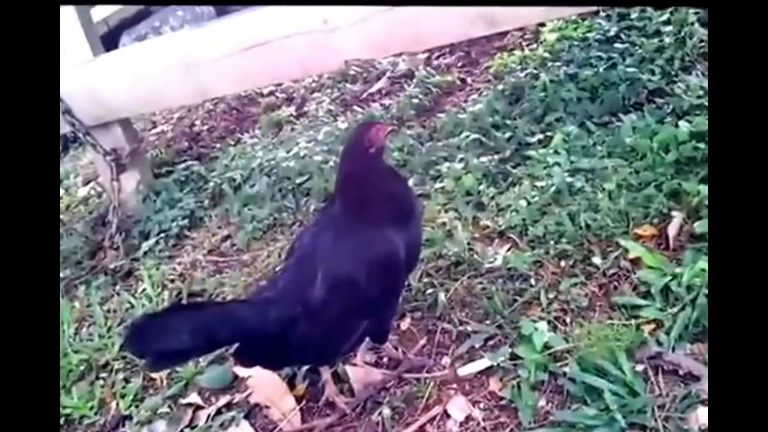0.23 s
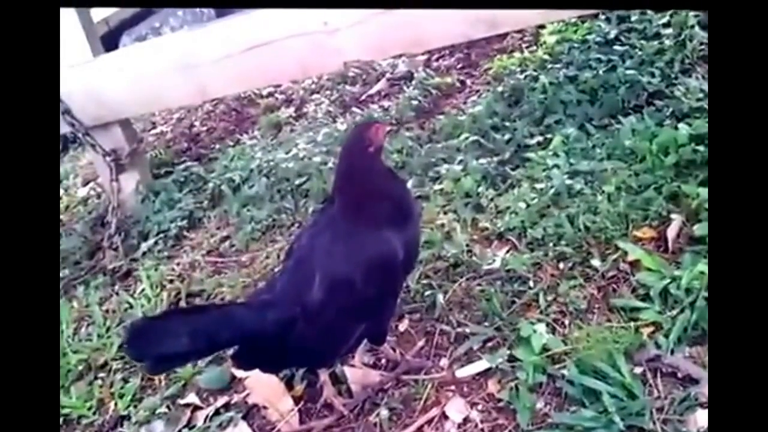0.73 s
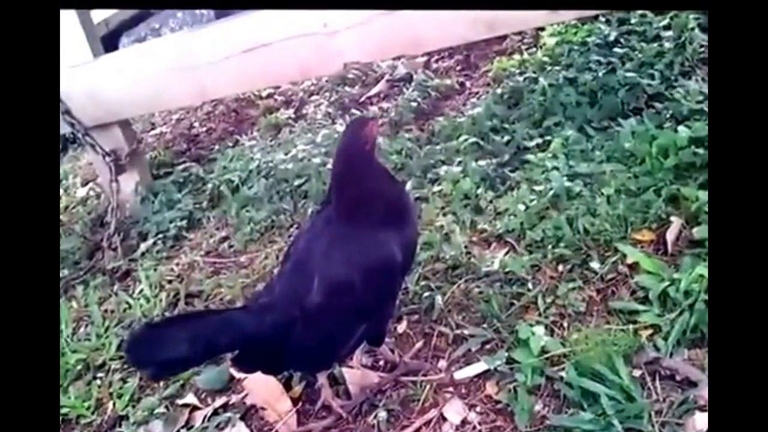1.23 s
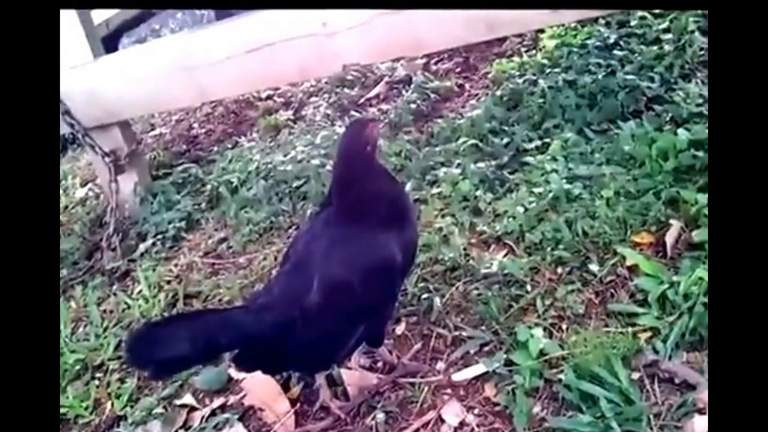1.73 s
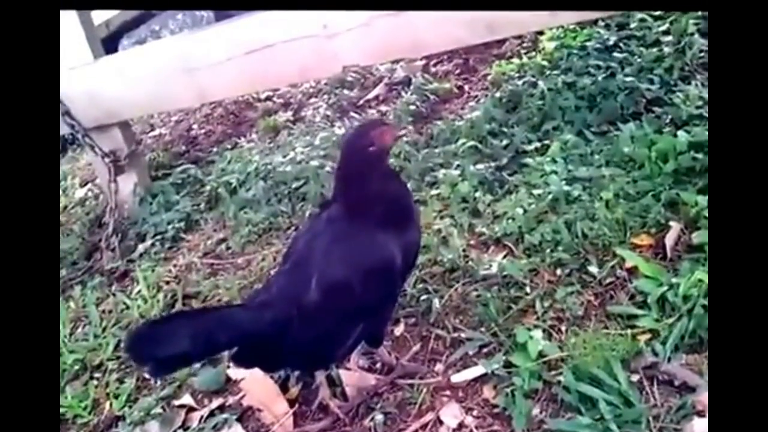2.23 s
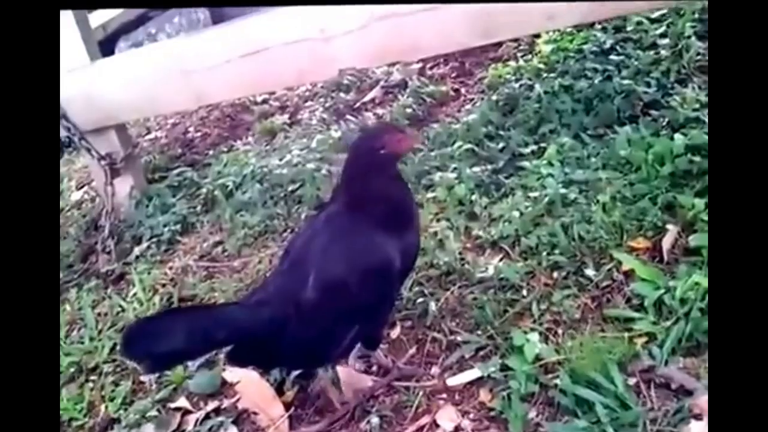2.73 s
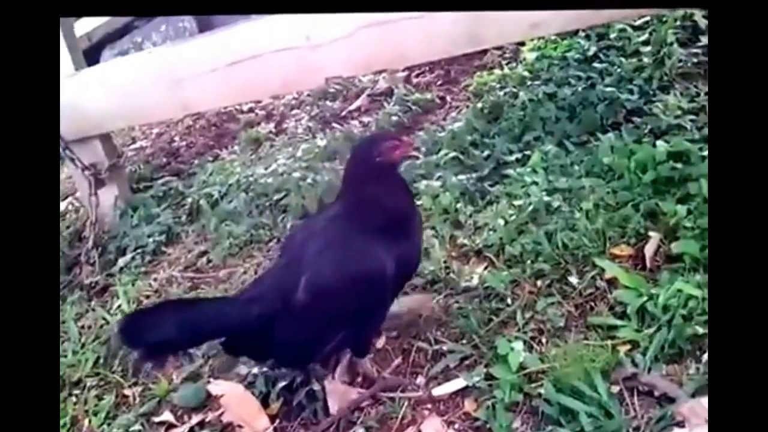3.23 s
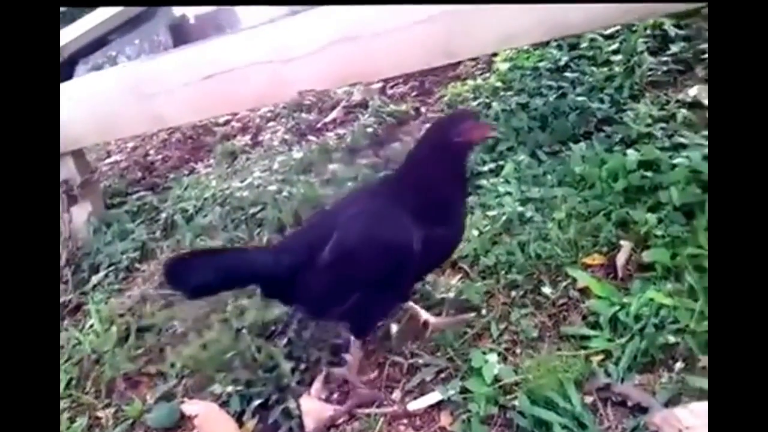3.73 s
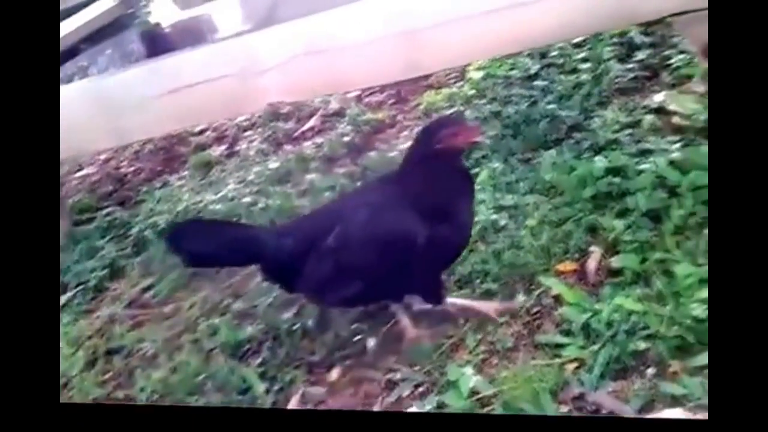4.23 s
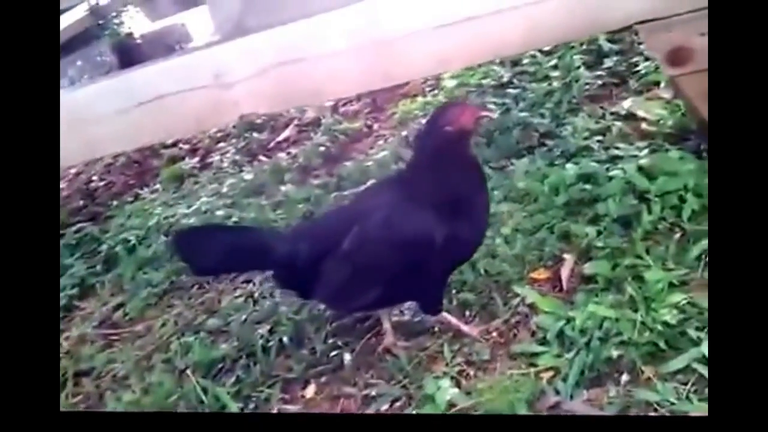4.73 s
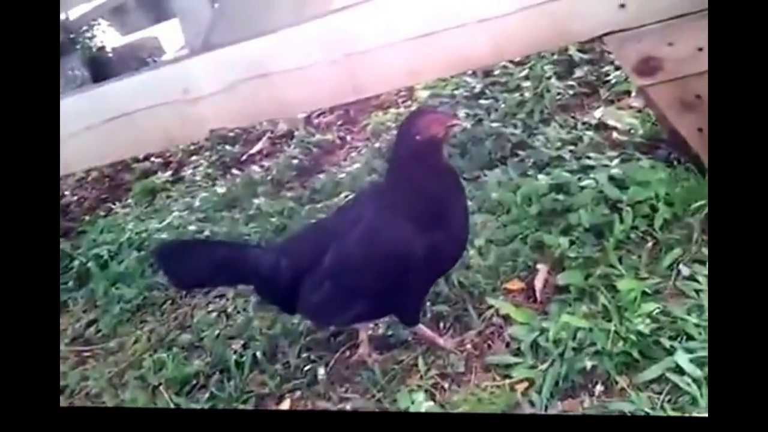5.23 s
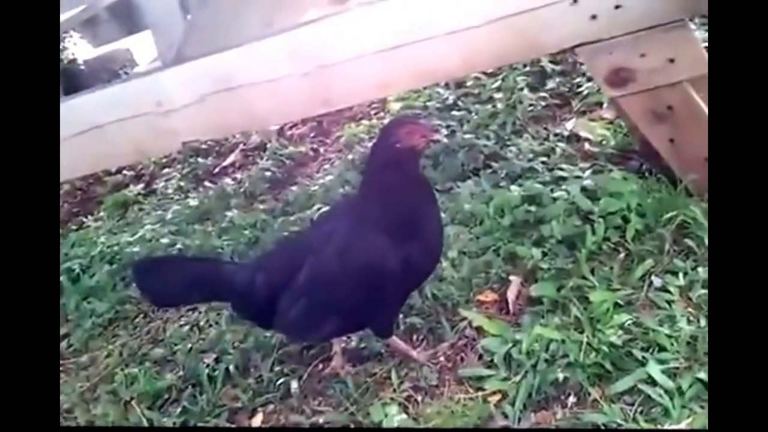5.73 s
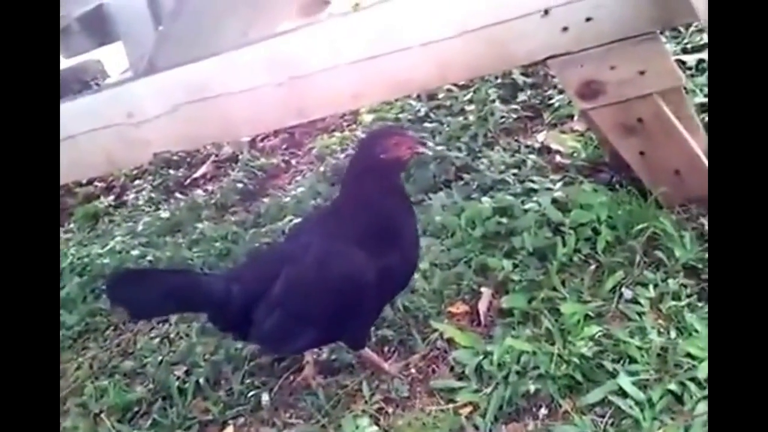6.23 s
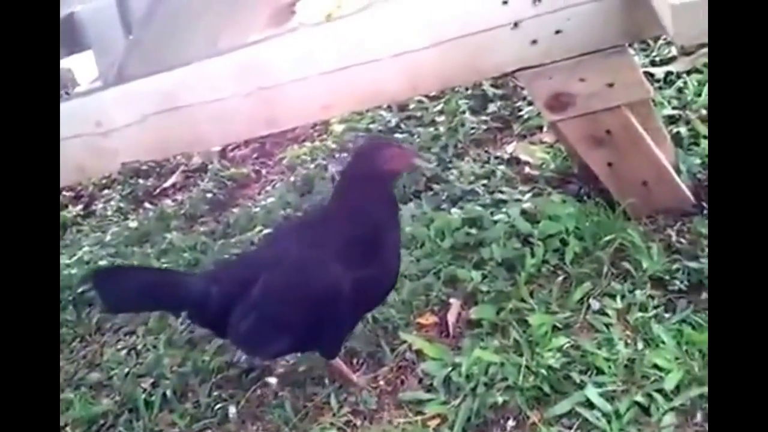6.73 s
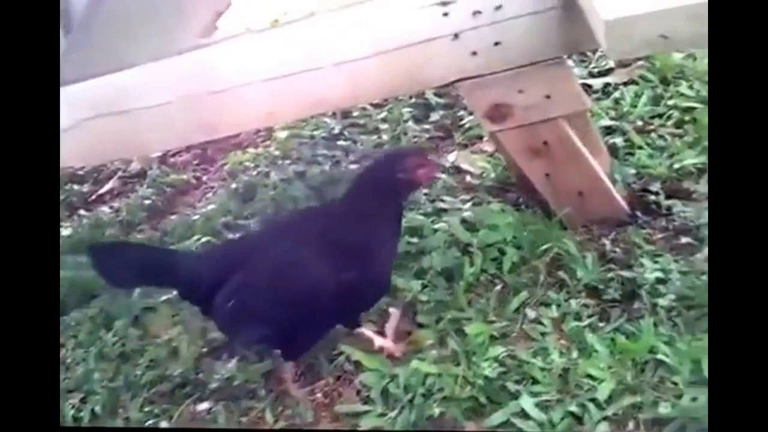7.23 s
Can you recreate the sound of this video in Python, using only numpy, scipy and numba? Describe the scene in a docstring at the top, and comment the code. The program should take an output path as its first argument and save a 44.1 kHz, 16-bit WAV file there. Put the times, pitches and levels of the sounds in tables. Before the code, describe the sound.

From 0 to about 2.8 s a nearby hen holds one long, hoarse, humming call, starting quietly around 490 Hz and creeping up towards 580 Hz as it swells and grows buzzier, with frequent cracks into a lower, brighter rasp. Small dry litter ticks click around 0.3 to 0.4 s and low coos sit behind. At 2.8 to 3.0 s another bird close on the left gives a sharp, hissy, gliding squeal near 3 kHz. The hen then clucks to the end at 7.5 s, about sixteen irregular clucks of 0.1 to 0.35 s, humming at first, increasingly harsh, rattling and loud after 4.6 s. Thin peeps appear from 5.3 s, clearest near 6 and 6.5 s, with two ticks around 6.5 s. Wind rumble, rustling leaves and distant traffic continue softly throughout; the sound is close stereo outdoor phone pickup with short ground and fence echoes.

```python
"""A long hoarse call swells and breaks into a run of rasping clucks: a hen in a yard near a phone.
Her syrinx hums a near-pure tone and slips into a lower, brighter register; its uneven pulses ring windpipe and beak.
A bird close on the left squeals in gliding partials with hiss; others peep and coo as gliding notes.
Litter ticks are damped cycles with a snap; wind, leaves and far traffic are banded noise."""
import sys
import numpy as np
from scipy import signal
from scipy.fft import rfft, irfft, next_fast_len
from scipy.io import wavfile
from scipy.ndimage import uniform_filter1d, map_coordinates
from numba import njit

SR = 44100
rng = np.random.default_rng(int(sys.argv[2]) if len(sys.argv) > 2 else 0)


def to_wav(sig):
    """Store sig (one row per channel, or 1-D mono) as 16-bit WAV at the path in sys.argv[1].

    Samples outside -1..1 are clipped; the rate is SR.
    """
    pcm = np.clip(np.atleast_2d(sig), -1, 1) * 32767
    pcm = np.round(pcm).astype(np.int16)
    wavfile.write(sys.argv[1], SR, pcm.T)  # frames by channels


N = 330309

# first two yelps of the squeal: start_s, length_s, first_hz, last_hz, level_db (before partials)
YELPS = [(2.784, 0.023, 1415, 3620, -27), (2.799, .058, 2090, 1942, -23)]
# then an arch in a doubled register: time_s, strongest_partial_hz, level_db (before partials)
ARCH = [(2.851, 3100, -21), (2.855, 2985, -15), (2.868, 2720, -20.5), (2.91, 2971, -13),
        (2.93, 2891, -18.5), (2.95, 2640, -18.5), (2.975, 2270, -18), (2.995, 2130, -32)]
# middle of a slip into the lower register, and its climb
SLIP_HZ, SLIP_RISE_HZ_PER_S = 463.3, 901


def undb(db):
    """Gain of a level in dB."""
    return 10 ** (np.asarray(db) / 20)


def unit(x):
    """Scaled to rms 1."""
    return x / np.sqrt(np.mean(x ** 2))


def track(tables, silent):
    """Columns of several tables interpolated in time; `silent` values outside them."""
    t = np.arange(N) / SR
    out = np.tile(np.array(silent, float)[:, None], N)
    for table in tables:
        time_s, *columns = np.transpose(table)
        inside = (t >= time_s[0]) & (t <= time_s[-1])
        out[:, inside] = [np.interp(t[inside], time_s, column) for column in columns]
    return out


def by_hz(table, hz):
    """A (hz, value) table read on a log-frequency axis."""
    table_hz, value = np.array(table).T
    return np.interp(np.log(hz + 1), np.log(table_hz), value)


def walk(rate_hz):
    """Random levels held 1 / rate_hz and slewed twice; rms 1."""
    hold = int(SR / rate_hz)
    steps = np.repeat(rng.standard_normal(N // hold + 1), hold)
    slewed = uniform_filter1d(uniform_filter1d(steps, hold), hold)
    return unit(slewed[:N])


@njit
def svf(x, hz, width):
    """State-variable band-pass with a moving centre, gain 1 there."""
    y, band, low = np.empty(len(x)), 0., 0.
    for i in range(len(x)):
        g, damping = np.tan(np.pi * hz[i] / SR), width / hz[i]
        v = (band + g * (x[i] - low)) / (1 + g * (g + damping))
        band, low, y[i] = 2 * v - band, low + 2 * g * v, damping * v
    return y


def steep(x, hz, nominal_width_hz):
    """A resonance applied twice for steeper skirts, each pass wider than the nominal width."""
    hz = hz + np.zeros(N)
    pass_width_hz = 1.34 * nominal_width_hz
    return svf(svf(x, hz, pass_width_hz), hz, pass_width_hz)


def hen():
    """Two membranes: one hums almost purely, the other closes in uneven pulses that ring windpipe and beak."""
    # long call: time_s, hum_hz, hum_db, rasp_db, beak_brightness_db
    call_rows = [(0, 490.7, -32, -43, -20), (.35, 506.4, -31, -41, -16), (.5, 516.7, -26, -38.5, -22),
                 (.9, 530, -21, -30, -13), (1.3, 541.3, -20, -28, -8), (1.8, 544.2, -19, -26, -13.5),
                 (2.3, 546.9, -17, -21, -15), (2.45, 559, -19.5, -20, -15.5),
                 (2.54, 556, -20.5, -26.5, -17.5), (2.65, 568.3, -16.5, -18.5, -16),
                 (2.75, 579.3, -20, -28.5, -14.5), (2.79, 580.8, -43, -41, -0.5)]
    # start_s, length_s, rasp_db, fade_across_cluck_db, hum_over_rasp_db, beak_brightness_db
    cluck_rows = [(2.806, 0.11, -14.5, -1, -1.5, -11.5), (3, 0.35, -21.5, 0.5, 1, -16),
                  (3.434, 0.31, -21.5, 1.5, 1, -15.5), (3.794, 0.12, -16, 0, -6, -12),
                  (4.018, 0.14, -17.5, 0, -5.5, -14.5), (4.256, 0.28, -21.5, 2.5, -1, -16.5),
                  (4.63, 0.35, -18.5, 1.5, -9.5, -11.5), (5.056, .12, -19, -3.5, -7, -10.5),
                  (5.237, 0.12, -17.5, -1, -8.5, -10.5), (5.461, 0.32, -16, 2, -13, -10),
                  (5.84, .15, -15, -1.5, -15, -11), (6.098, 0.29, -14.5, 1.5, -12, -10),
                  (6.471, 0.17, -13.5, -1.5, -16.5, -11.5), (6.764, 0.31, -13, 0, -14.5, -12),
                  (7.162, 0.16, -12, -3, -13, -11.5), (7.381, 0.12, -10, -6.5, -18, -13)]
    # time_s, cluck_hum_hz, roughness_0_1, neck_stretch_0_1
    posture = [(0, 543, 0.22, 0), (.7, 500, 0.22, 0.04), (1.6, 532.1, 0.46, 0), (2.7, 540.8, 0.48, 0),
               (4.5, 538.5, 0.46, 0), (4.7, 528.2, 0.7, 0.07), (5.4, 522.8, .8, 0.37),
               (6.1, 520.7, 0.7, 0.72), (7.49, 520.7, 0.67, 0.87)]
    # windpipe: rest_hz, rest_db, stretched_hz, stretched_db, nominal_width_hz (levels relative)
    pipe_modes = [(335, -13.5, 354, -14, 64), (414, -14.5, 480, -14.5, 222), (687, -10, 640, -23.5, 232),
                  (897.6, -1, 772, -2.5, 106), (984, -6.5, 1087, -6.5, 137), (1192, -3, 1105, 1, 72.4),
                  (1334.4, -4.5, 1394, -17, 101), (1661, -12, 1637, -10.5, 124),
                  (1960, -32.5, 1870, -29, 410)]
    # beak and head: rest_hz, rest_db, stretched_hz, stretched_db, nominal_width_hz (levels relative)
    beak_modes = [(2267, -10.5, 2340, -4, 311.4), (2738.4, 5, 2695, 2.5, 229),
                  (3100, -15.5, 3004, -7.5, 246.4), (3613, 1, 3474, -4.5, 280),
                  (3736, -8, 3916, -10.5, 396), (4680.7, -11.5, 4691, -16.5, 560),
                  (5660, -18, 5410, -15, 560), (6800, -21.5, 6560, -18.5, 1962)]
    full_slip_db = 13  # weaker slips pull the hum less
    slip_hum_db, slip_pull = -4.5, .65  # the hum sinks in a slip and is drawn this share of the way to it
    slack_hz, slack_s = 34.98, .2  # slips start this much lower until the membranes tighten
    # one head resonance until the beak opens
    shut_hz, shut_nominal_width_hz, shut_db, opens_s, opening_s = 3125, 440, -22.5, 1.674, 0.21

    call_hz, call_db, call_rasp_db, call_bright_db = track([call_rows], silent=[0, -120, -120, -20])
    cluck_db, over_db, cluck_bright_db, lift = track([cluck(*row) for row in cluck_rows],
                                                     silent=[-120, 0, -20.5, 0])
    cluck_hz, rough, stretch = track([posture], silent=[520, .5, 1])
    calling = call_hz > 0
    hum_hz = np.where(calling, call_hz, cluck_hz)
    hum_db = np.where(calling, call_db, cluck_db + over_db)
    rasp_db = np.where(calling, call_rasp_db, cluck_db)
    bright_db = np.where(calling, call_bright_db, cluck_bright_db)

    slip, rise_s, slip_db = slips()
    t = np.arange(N) / SR
    slip_hz = SLIP_HZ - slack_hz * np.exp(-t / slack_s)
    climb_hz = SLIP_RISE_HZ_PER_S * rise_s
    pull = np.clip(slip_db / full_slip_db, 0, 1) * slip_pull
    hum_hz = hum_hz + pull * (slip * (slip_hz - hum_hz) + climb_hz)
    rough = np.clip(rough, 0, 1)
    hum_hz = hum_hz * (1 + .06 * rough ** 2 * walk(50) + .1 * rough ** 2 * walk(200))
    hum_flutter_db = 5.4 * rough * walk(45) + slip_hum_db * slip
    hum = np.sqrt(2) * np.sin(2 * np.pi * np.cumsum(hum_hz) / SR) * undb(hum_flutter_db)

    # pulses follow the hum; in a slip they take the slip pitch, steadier, and climb
    rough = rough * (1 - 0.57 * slip)
    pulse_hz = hum_hz * (1 - slip) + slip_hz * slip + climb_hz
    phase = np.cumsum(pulse_hz) / SR
    cycle = phase.astype(int)
    at = np.flatnonzero(np.diff(cycle)) + 1
    late_chance, size_chance = np.clip(rng.standard_normal((N // 50, 2))[:len(at)].T, -2.2, 2.2)
    # closures alternate in twos and fours; roughness scatters size and moment
    twos_db = 4 * (cycle[at] % 2 == 0)
    fours_db = 5 * (cycle[at] % 4 == 0) * (1 - slip[at]) * (1 - stretch[at])
    size_db = twos_db + fours_db + 5.23 * rough[at] * size_chance
    late = (.2 * rough[at] * late_chance * SR / pulse_hz[at]).astype(int)
    pulses = np.zeros(N)
    np.add.at(pulses, np.clip(at + late, 0, N - 1), undb(size_db))
    # breath noise decays within each cycle
    air = rng.standard_normal(N) * np.exp(-(phase % 1) / 0.43)
    # a rough voice rattles in level
    drive = (unit(pulses) + .7 * rough * unit(air)) * undb(1.58 * rough * walk(120))

    # the throat never holds quite still, so its resonances drift
    stretch = stretch + 0.14 * walk(13)
    pipe = ring(drive, pipe_modes, stretch, lift)
    beak = ring(drive, beak_modes, stretch, .012 * walk(25))
    beak = signal.sosfilt(signal.butter(8, 7600, fs=SR, output="sos"), beak)
    shut = 1 / (1 + np.exp((t - opens_s) / opening_s))
    pipe = pipe + shut * undb(shut_db) * unit(steep(drive, shut_hz, 1. * shut_nominal_width_hz))

    def soften(db):
        """Gain smoothed over 90 samples against clicks."""
        return uniform_filter1d(undb(db), size=90)

    hum_out = hum * soften(hum_db)
    pipe_out = pipe * soften(rasp_db + 0.74 * slip_db)
    beak_out = (1 - shut) * beak * soften(rasp_db + bright_db + 1.21 * slip_db)
    return hum_out + pipe_out + beak_out


def cluck(start_s, length_s, rasp_db, fade_db, over_db, bright_db):
    """Quick attack, changing hold, short release: time_s, rasp_db, hum_over_rasp_db, brightness_db, lift_share."""
    attack_s, attack_db, release_s, release_db = 0.023, -24, 0.043, -20.5
    knee, knee_share = 0.27, 0.42  # this far into the attack only this share of its depth is left
    lift_start, lift_end = -0.059, .03  # windpipe pitch shift as a cluck opens and closes
    first_db, last_db = rasp_db - fade_db / 2, rasp_db + fade_db / 2
    # at the edges the hum is stronger against the rasp and the beak duller
    edge = over_db + 3.5, bright_db - 1
    return [(start_s, first_db + attack_db, *edge, lift_start),
            (start_s + knee * attack_s, first_db + knee_share * attack_db, *edge, lift_start),
            (start_s + attack_s, first_db, over_db, bright_db, lift_start / 2),
            (start_s + length_s - release_s, last_db, over_db, bright_db, lift_end / 2),
            (start_s + length_s, last_db + release_db, *edge, lift_end)]


def slips():
    """Register slips along the time line: depth 0-1, weighted seconds from the centre, nominal rasp gain in dB."""
    # centre_s, nominal_length_s, nominal_rasp_gain_db (scaled apart for windpipe and beak)
    slip_rows = [(.018, 0.049, 22), (0.102, .05, 17.5), (.185, 0.053, 18.5), (0.276, 0.05, 21),
                 (0.363, 0.037, 18), (0.428, 0.033, 11.5), (0.488, 0.025, 14), (0.535, 0.016, 21),
                 (0.594, 0.033, 13.5), (0.646, 0.0098, 8), (0.692, 0.03, 4.5), (0.824, 0.022, 5),
                 (0.96, 0.018, 5.5), (1.051, 0.016, 3), (1.094, .016, 11.5), (1.143, 0.017, 9.5),
                 (1.184, .021, 7), (1.246, 0.023, 9), (1.339, 0.024, 14.5), (1.489, .016, 7),
                 (1.738, 0.026, 8.5), (1.793, .015, 12.5), (1.828, 0.037, 14), (1.912, 0.011, 12.5),
                 (1.992, 0.045, 8), (2.075, 0.034, 10), (2.157, .034, 12.5), (2.226, .018, 13.5),
                 (2.259, .015, 11), (2.317, .022, 10.5), (2.374, .02, 12), (2.403, 0.019, 11),
                 (2.453, 0.017, 10), (2.491, .04, 14.5), (2.615, 0.03, 9), (2.681, .015, 10.5),
                 (2.823, .02, 3.5), (2.884, .02, 4.5), (3.037, 0.034, 10), (3.107, 0.024, 11),
                 (3.14, .025, 10), (3.251, 0.021, 9.5), (3.294, 0.036, 13), (3.476, 0.038, 11),
                 (3.562, 0.034, 7), (3.654, 0.027, 6), (3.694, 0.021, 6.5), (3.825, .017, 5),
                 (3.862, .018, 6), (4.085, 0.029, 6), (4.292, 0.049, 12.5), (4.359, .012, 1.5),
                 (4.431, .02, 7), (4.485, 0.024, 9), (4.67, .022, 9), (4.718, 0.015, 8.5),
                 (4.743, .012, 7.5), (4.808, .032, 7), (4.874, .012, 7.5), (4.918, .02, 7.5)]
    depth, rise_s, gain_db = np.zeros((3, N))
    for centre_s, length_s, db in slip_rows:
        at = np.arange(max(int((centre_s - length_s) * SR), 0), int((centre_s + length_s) * SR))
        t = at / SR - centre_s
        bump = np.exp(-(t / (.6 * length_s)) ** 4)
        depth[at] += bump
        rise_s[at] += bump * t
        gain_db[at] += bump * db
    return np.clip(depth, 0, 1), rise_s, gain_db


def ring(drive, modes, stretch, lift):
    """Resonances that shift in pitch and strength as the neck stretches; neighbours alternate in sign."""
    out = 0
    for k, (rest_hz, rest_db, long_hz, long_db, width_hz) in enumerate(modes):
        mode_hz = (rest_hz + (long_hz - rest_hz) * stretch) * (1 + lift)
        gain = undb(rest_db + (long_db - rest_db) * stretch)
        out = out + (-1) ** k * gain * steep(drive, mode_hz, 1. * width_hz)
    return unit(out)


def moving(pair):
    """The hen walks and the phone turns: lag and balance between the ports follow the bearing."""
    # time_s, extra_left_lag_ms, left_minus_right_db
    bearing = [(0, 0.12, -2), (2, .16, 0.5), (4.7, 0.11, -1), (5.1, -0.038, -0.5), (7.49, -0.083, -0.5)]
    lag_ms, pan_db = track([bearing], silent=bearing[-1][1:])
    left = map_coordinates(pair[0], [np.arange(N) - lag_ms * SR / 1000], order=3, mode="nearest")
    return np.array([left, pair[1]]) * undb(np.array([pan_db, -pan_db]) / 2)


def ports(x, pan_db):
    """Two microphone ports: the phone body shades and delays the far one; echoes off ground and fence differ."""
    # frequency_hz, left_minus_right_db
    shade_curve = [(60, -6), (110, -14), (200, -3.5), (370, -1.5), (690, -2.5), (1270, 6), (2340, 5),
                   (4300, 7.5), (7920, -7.5), (14600, -6)]
    # frequency_hz, left_lead_rad
    lead_curve = [(100, -3.5), (500, 0.5), (800, -1), (1100, 0.38), (1460, -2), (1720, -2), (2330, -3),
                  (3500, -4.5), (8000, -10)]
    echo_db, echo_t60_s, echo_low_cut_hz = 1.5, 0.038, 1900  # level before the echoes' bass below this frequency is cut away
    tail_db, tail_t60_s = -26.5, 0.46  # level against the undecayed early echoes
    size = next_fast_len(N + SR // 2)
    hz, t = np.fft.rfftfreq(size, 1 / SR), np.arange(SR // 3) / SR
    echoes = rng.standard_normal((2, len(t))) * 10 ** (-3 * t / echo_t60_s) * (t > .001)
    # far walls add a faint, longer tail
    tail = rng.standard_normal((2, len(t))) * 10 ** (-3 * t / tail_t60_s) * (t > .01)
    echoes = echoes + undb(tail_db) * tail
    echoes = undb(echo_db) * echoes / np.linalg.norm(echoes, axis=1, keepdims=True)
    echoes = rfft(echoes, size) / (1 + (echo_low_cut_hz / (hz + 1)) ** 4)
    side = np.array([[.5], [-.5]])
    shade = undb(side * (by_hz(shade_curve, hz) + pan_db)) * np.exp(1j * side * by_hz(lead_curve, hz))
    return irfft(rfft(x, size) * shade * (1 + echoes), size)[:, :N]


def notes(tables, partials, waver, flutter_db, hoarse):
    """Near-pure bird notes with a few partials, slightly unsteady; `hoarse` spreads noise round each partial."""
    out = 0
    for table in tables:
        hz, db = track([table], silent=[table[0][1], -120])
        phase = 2 * np.pi * np.cumsum(hz * (1 + waver * walk(120))) / SR
        tone = sum(undb(part_db) * np.sin(multiple * phase) for multiple, part_db in partials)
        tone = tone * (1 + hoarse * (walk(2500) + walk(460)))
        out = out + np.sqrt(2) * tone * uniform_filter1d(undb(db), size=200) * undb(flutter_db * walk(70))
    return out


def glide(start_s, length_s, first_hz, last_hz, db):
    """A note that swells, glides evenly and fades: rows time_s, pitch_hz, level_db."""
    edge, edge_db = 0.23, -11.5  # share of the note spent swelling, and again fading
    share = np.array([0, edge, 1 - edge, 1])
    level_db = db + edge_db * np.array([1, 0, 0, 1])
    return np.transpose([start_s + length_s * share, first_hz + (last_hz - first_hz) * share, level_db])


def wheeze():
    """Air hissing past the squealer's beak, band-passed noise from the first yelp to the end of the arch."""
    hiss_hz, hiss_nominal_width_hz, hiss_db = 4300, 3300, -35.5
    start_s = YELPS[0][0]
    swell = glide(start_s, ARCH[-1][0] - start_s, hiss_hz, hiss_hz, hiss_db)
    hz, db = track([swell], silent=[hiss_hz, -120])
    air = signal.sosfilt(signal.butter(8, 7500, fs=SR, output="sos"), rng.standard_normal(N))
    return unit(steep(air, hz, 1. * hiss_nominal_width_hz)) * undb(db + 3.4 * walk(60))


def ticks():
    """Dry litter ticks: each a few damped cycles over a broad snap."""
    # start_s, level_db (before damping and snap), ring_hz, left_minus_right_db
    tick_rows = [(0.0366, -35.5, 5000, 18), (0.2995, -30, 2000, 10), (0.3294, -32, 2660, 4),
                 (0.3605, -17.5, 7550, 7), (0.3814, -38, 3870, 9), (0.386, -27.5, 4300, 13),
                 (2.4979, -33, 2800, 19), (4.8888, -49, 2824, 5), (6.5299, -25, 2556, 12),
                 (6.5698, -22, 2716, 2)]
    out, t = np.zeros((2, N)), np.arange(300) / SR
    snaps = rng.standard_normal((len(tick_rows), 300))
    for (start_s, db, hz, pan_db), noise in zip(tick_rows, snaps):
        snap = 0.22 * uniform_filter1d(np.diff(noise, prepend=0), size=3)
        tick = (np.sin(2 * np.pi * hz * t) + snap) * np.exp(-t / 0.001)
        first = int(start_s * SR)
        out[:, first:first + 300] += undb(db + np.array([[pan_db], [-pan_db]]) / 2) * tick
    return out


def yard():
    """Wind, leaves and far traffic: overlapping noise bands that swell together and flicker alone."""
    # frequency_hz, relative_density_db
    spectrum = [(13, -31.5), (25, -3.5), (45, 6), (63, -2), (86, 0.5), (116, -5), (371, -16), (457, -10.5),
                (748, -15.5), (1510, -25), (1630, -29), (3450, -36), (4030, -32), (4590, -30.5),
                (8330, -39), (9990, -52.5), (10800, -97), (14000, -109), (22000, -120)]
    # frequency_hz, left_right_likeness (clipped to 0-1)
    likeness = [(25, 0.13), (60, 1), (130, 0.98), (400, 0.87), (1200, 1), (3000, 0.038)]
    # time_s, wind_rumble_db, leaf_rustle_db (rustle phased in over the bands)
    gusts = [(0, 1, 0), (1.2, 2, -1.5), (2.7, -0.5, -0.5), (3.5, -0.5, 0.5), (5.5, 2, -1.5),
             (6.4, 2.5, 3.5), (7.49, 1.5, 2)]
    bass_db = -30.5  # rms of the mono sum low-passed at 200 Hz
    hz = np.fft.rfftfreq(N + 441, 1 / SR)
    rumble_db, rustle_db = track([gusts], silent=gusts[-1][1:])
    mid, side = rfft(rng.standard_normal((2, N + 441)))
    alike = np.clip(by_hz(likeness, hz), 0, 1)
    both = np.sqrt(1 + alike) * mid + np.sqrt(1 - alike) * side * np.array([[1], [-1]])
    both = undb(by_hz(spectrum, hz)) * both
    out, swell = 0, walk(0.73)
    for step in range(15):
        distance = np.clip(1.5 * np.log2((hz + 1) / 20) - step, -1, 1)
        share = np.cos(np.pi / 2 * distance) ** 2
        gust_db = rumble_db if step < 5 else rustle_db * min((step - 4) / 5, 1)
        band = irfft(both * share)[:, :N]
        out = out + undb(gust_db + 0.43 * swell + 2.46 * walk(4.3)) * band
    bass = signal.sosfilt(signal.butter(2, 200, fs=SR, output="sos"), out.mean(axis=0))
    return out * undb(bass_db) / bass.std() * undb([[-1.2], [1.2]])


def scene():
    """The hen ahead, the squealer close on the left, the rest of the flock around."""
    # thin peeps of other birds: start_s, length_s, first_hz, last_hz, level_db (before partials)
    peep_rows = [(5.326, .15, 2133, 2157, -42), (5.747, 0.098, 2720, 2704, -51),
                 (5.946, .16, 1814, 1774, -26.5), (6.453, .11, 1806, 1790, -24),
                 (6.615, .04, 4350, 4130, -47), (6.672, .055, 3260, 3100, -48),
                 (6.691, 0.1, 2510, 2250, -39.5), (6.662, .11, 1790, 1830, -45),
                 (7.058, 0.087, 1755, 1794, -45)]
    # soft low coos of other hens: start_s, length_s, first_hz, last_hz, level_db (before partials)
    coo_rows = [(.13, 0.061, 325, 333, -39.5), (.65, .12, 324, 321, -40.5), (2.071, 0.1, 365, 290, -31),
                (2.46, .16, 342, 267, -38.5), (3.73, 0.076, 475, 424, -35.5), (5.35, 0.1, 282, 284, -40)]
    # partials: multiple_of_note_pitch, level_db
    yelp_partials = [(1, 1.5), (2, -11), (3, -30.5), (4, -38)]
    arch_partials = [(.5, -15), (1, -2), (1.5, -19), (2, -31.5), (2.5, -33.5), (3, -35.5), (4, -49),
                     (5, -57)]
    coo_partials = [(1, 4), (2, -18), (3, -4), (4, -12.5)]
    peep_partials = [(1, 0.5), (2, -30.5), (3, -22.5)]

    yelps = notes([glide(*row) for row in YELPS], yelp_partials, waver=0.0059, flutter_db=2.0, hoarse=0.51)
    arch = notes([ARCH], arch_partials, waver=0.006, flutter_db=1.5, hoarse=0.17)
    squeal = yelps + arch + wheeze()
    peeps = notes([glide(*row) for row in peep_rows], peep_partials, waver=.008, flutter_db=5.0, hoarse=0.25)
    coos = notes([glide(*row) for row in coo_rows], coo_partials, waver=0.0091, flutter_db=4.0, hoarse=0.095)
    flock = ports(squeal, pan_db=10) + ports(peeps, pan_db=3.0) + ports(coos, pan_db=4.5)
    return moving(ports(hen(), pan_db=1.5)) + flock + ticks() + yard()


def record(dry):
    """The loudest peaks are rounded off and the top is cut."""
    top_hz = 15200
    rounded = dry / (1 + np.abs(dry) ** 6) ** (1 / 6)
    return signal.sosfilt(signal.ellip(8, .2, 70, top_hz, fs=SR, output="sos"), rounded)


dry = scene()
out = record(dry)
to_wav(out)
```